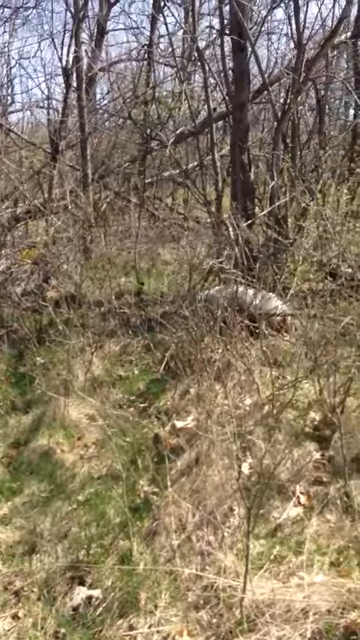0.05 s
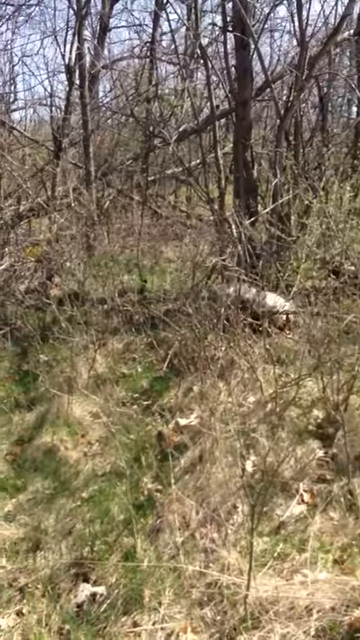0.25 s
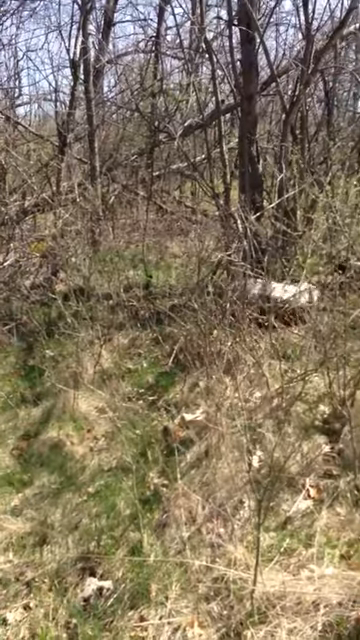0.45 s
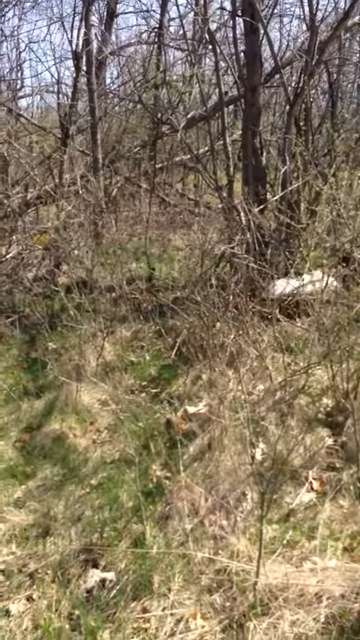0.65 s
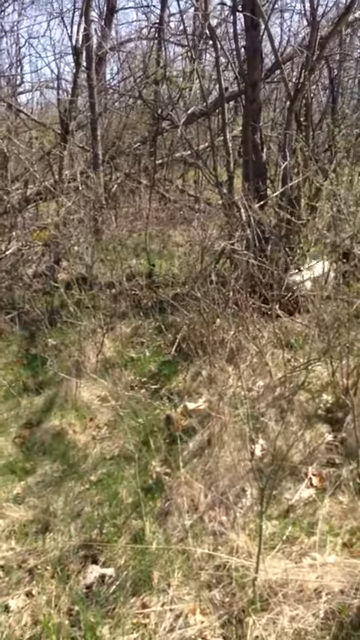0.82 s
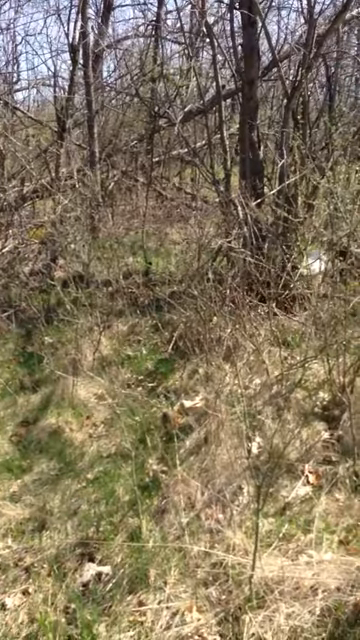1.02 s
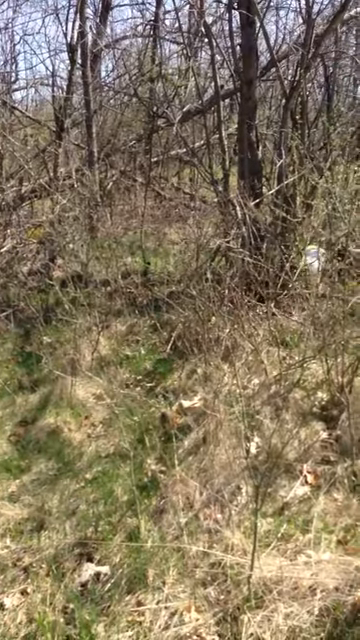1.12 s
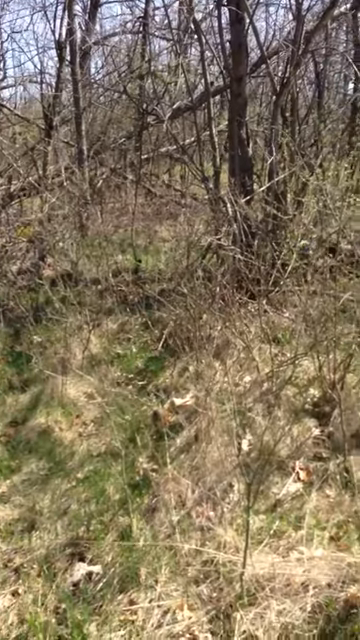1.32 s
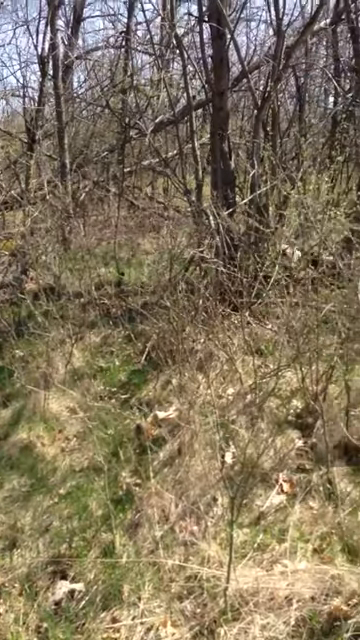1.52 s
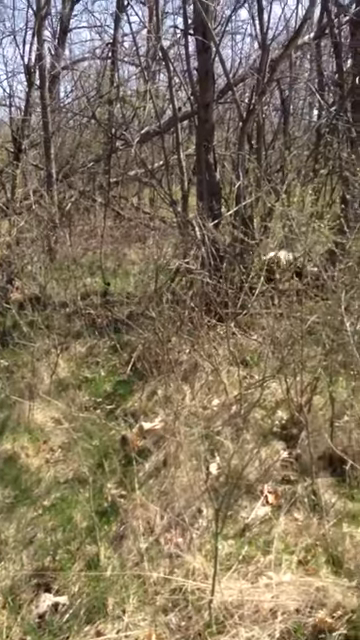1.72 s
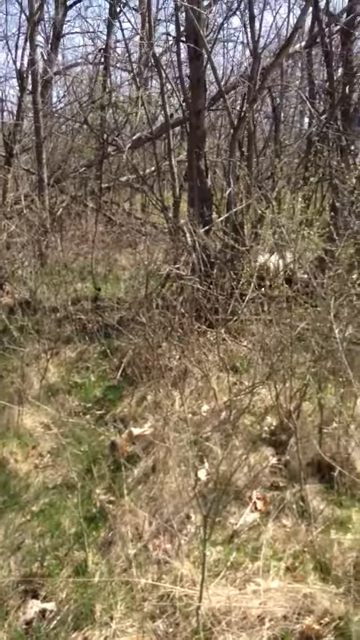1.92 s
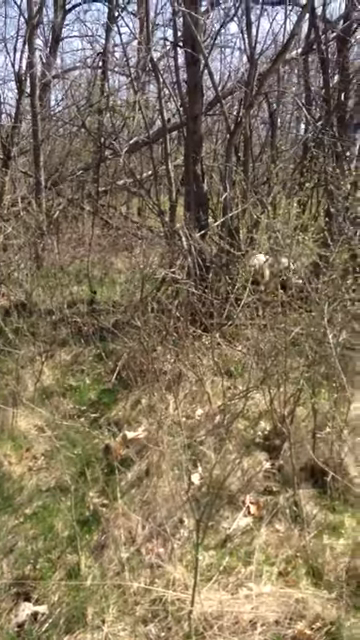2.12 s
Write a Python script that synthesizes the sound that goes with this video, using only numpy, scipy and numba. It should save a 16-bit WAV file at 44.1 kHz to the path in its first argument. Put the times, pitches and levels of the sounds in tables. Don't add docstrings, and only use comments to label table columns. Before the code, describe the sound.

A dog pushes through dry leaf litter and brush some metres away; thin crackly swishes and tiny twig ticks, one sharp stick snap near the start, then a faint paw thud, over very quiet outdoor air, in mono.

```python
import sys
import numpy as np
from scipy import signal
from scipy.fft import rfft, irfft, next_fast_len
from scipy.io import wavfile
from scipy.ndimage import uniform_filter1d
from numba import njit

SR = 44100
rng = np.random.default_rng(int(sys.argv[2]) if len(sys.argv) > 2 else 0)


def volts_from_decibels(level):
    exponent = np.asarray(level, float) / 20
    return 10 ** exponent


def wav_record(signal):
    frames = np.transpose(np.atleast_2d(signal))
    bounded = np.clip(frames, -1, 1)
    quanta = np.round(bounded * 32767).astype(np.int16)
    wavfile.write(sys.argv[1], SR, quanta)


N = 94815
T = np.arange(N) / SR

# peak_s, rise_s, fall_s, level_db, pitch_hz
STRIDES = [(.03, 0.031, 0.042, -52.5, 5130), (.15, 0.078, 0.22, -55, 6800), (.30, .04, 0.1, -57.5, 6100),
           (.39, 0.034, 0.035, -58, 6000), (.54, 0.023, 0.15, -54.5, 4700),
           (0.617, 0.0034, 0.0076, -40, 4700), (.644, 0.0064, 0.018, -42.5, 5500),
           (0.701, 0.063, 0.069, -49, 6000), (.78, .01, 0.019, -54, 4960), (.90, 0.043, 0.054, -50.5, 6140),
           (.96, 0.035, 0.037, -47, 5400), (.995, 0.03, 0.02, -44, 6800), (1.096, 0.04, 0.059, -51.5, 6900),
           (1.128, 0.033, 0.015, -52, 6600), (1.311, 0.043, 0.045, -53.5, 5000),
           (1.35, 0.027, 0.027, -53.5, 5400), (1.452, 0.038, 0.023, -55, 7550),
           (1.505, 0.0089, 0.0093, -54.5, 6500), (1.585, 0.053, 0.043, -52.5, 6400),
           (1.776, 0.036, 0.057, -46, 5400), (1.81, 0.028, 0.025, -49.5, 4840),
           (1.85, 0.061, 0.062, -49, 6000), (1.919, 0.01, 0.028, -53.5, 6800),
           (2.09, .06, 0.099, -55, 5250)]
# start_s, peak_db, pitch_hz, t60_s
TWIG_TICKS = [(.019, -43, 3960, 0.025), (.034, -44, 4540, 0.033), (0.1363, -41, 8000, 0.0041),
              (0.1675, -41.5, 7660, 0.023), (0.5008, -46, 7850, 0.0043), (0.529, -37, 3100, .015),
              (.5574, -46, 3500, .008), (0.6135, -35, 7900, 0.0034), (0.6398, -32.5, 7000, 0.0036),
              (.655, -41, 7000, .003), (.683, -35, 8000, 0.012), (.687, -48, 9000, .003),
              (.7045, -41, 5970, 0.01), (.777, -46.5, 5060, 0.019), (0.8552, -36, 5700, 0.0067),
              (.876, -44, 7500, 0.0091), (.899, -51, 7000, .005), (.902, -40, 9000, 0.0032),
              (.9184, -42, 7800, .003), (0.924, -42, 7500, .004), (0.979, -34, 4800, .006),
              (.991, -42, 7000, 0.0024), (1.308, -39, 4000, 0.0055), (1.449, -39.5, 8040, 0.0039),
              (1.709, -41, 8800, 0.019), (1.776, -34, 9100, 0.0068), (2.033, -42, 10000, 0.0043),
              (2.059, -37, 8900, 0.0018), (2.084, -43, 5000, 0.016), (2.1312, -40, 4500, 0.011)]
# frequency_hz, level_db
LEAF_SPECTRUM = [(500, -17), (1200, -9), (2300, -4), (4200, -2), (6800, 0.5), (9500, -2.5), (12500, -3.5),
                 (15500, -8)]
# frequency_hz, level_db, t60_s
STICK_MODES = [(766, -35.5, 0.057), (1750, -23.5, 0.022), (3100, -10, 0.012), (4400, -6, 0.011),
               (5400, -2.5, 0.0086), (6160, 1, 0.0066), (6800, -3, 0.0068), (7800, -20, 0.0074),
               (10600, -11, 0.0099), (12090, -12, 0.0086)]
# frequency_hz, level_db
SPLINTER_SPECTRUM = [(400, -24), (1500, -12), (7000, 0), (15000, -8)]
# peak_s, length_s, level_db, pitch_hz
SOIL_SCUFFS = [
    (0.464, 0.015, -63.5, 810),
    (.51, 0.052, -66.5, 503),
    (.55, 0.012, -63, 182),
    (1.283, 0.013, -60, 161),
    (1.675, .02, -61, 900),
    (1.799, 0.013, -58, 1450),
    (1.813, 0.018, -57, 365),
    (2.108, 0.027, -62, 900),
]
# frequency_hz, level_db (per Hz)
AIR_SPECTRUM = [(25, -40), (85, -7.5), (140, 5), (210, 4), (450, -4), (850, -1), (2500, -13), (15500, -17)]


def shape(x, table):
    hz, db = np.array(table, float).T
    n = next_fast_len(len(x), True)
    f = np.maximum(np.arange(n // 2 + 1) * SR / n, 1.0)
    gain = volts_from_decibels(np.interp(np.log(f), np.log(hz), db))
    return irfft(rfft(x, n) * gain, n)[:len(x)]


def unit(x):
    return x / np.sqrt(np.mean(x ** 2))


def walk(rate_hz):
    hold = int(SR / rate_hz)
    steps = np.repeat(rng.standard_normal(N // 32), hold)[:N]
    return uniform_filter1d(uniform_filter1d(steps, hold), hold)


@njit
def rings(n, start, turn, fade, size):
    out = np.zeros(n)
    for g in range(len(start)):
        step = np.exp(1j * turn[g] - fade[g])
        i = int(start[g])
        z = (1. + 0j) * step ** (i + 1 - start[g])
        while abs(z) > .002 and i + 1 < n:
            i += 1
            out[i] += size[g] * z.imag
            z *= step
    return out


def ring(start_s, hz, t60_s, size):
    hz = np.clip(hz, 100, .45 * SR)
    fade = np.log(1000) / (np.maximum(t60_s, 1e-4) * SR)
    return rings(N, start_s * SR, 2 * np.pi * hz / SR, fade, size)


def leaves():
    grain_count, grain_cycles, octaves = 28000, 1.72, 0.51
    spread_db, top_db, patchy_db = 2.5, 15, 1.63
    bed = volts_from_decibels(-64.5) ** 2
    power, pitch = bed + 0 * T, bed * np.log(6000.)
    for peak_s, rise_s, fall_s, db, hz in STRIDES:
        age = np.where(T < peak_s, (peak_s - T) / rise_s, (T - peak_s) / fall_s)
        push = volts_from_decibels(db) ** 2 * np.exp(-2 * age)
        power = power + push
        pitch = pitch + push * np.log(hz)
    when, tone, big, sign = rng.random((grain_count, 4)).T
    at = (when * (N - 1)).astype(int)
    hz = np.exp(pitch / power)[at] * 2 ** (octaves * 2 * (2 * tone - 1))
    grain_db = np.minimum(-spread_db * np.log(big + 1e-9), top_db)
    size = volts_from_decibels(grain_db) * np.sign(sign - .5) * hz
    t60_s = np.log(1000) * grain_cycles / (np.pi * hz)
    grains = ring(at / SR, hz, t60_s, size)
    return unit(shape(grains, LEAF_SPECTRUM)) * np.sqrt(power) * volts_from_decibels(patchy_db * walk(90))


def twigs():
    ring_db, ring_share, rise_share, crack_db = -12, .4, 0.087, 0.5
    start_s, peak_db, pitch_hz, t60_s = np.array(TWIG_TICKS).T
    out = ring(start_s, pitch_hz, ring_share * t60_s, volts_from_decibels(peak_db + ring_db))
    t = T[:2048]
    noises = rng.standard_normal((len(start_s), len(t)))
    for s, db, hz, t60, noise in zip(start_s, peak_db, pitch_hz, t60_s, noises):
        fibres = shape(noise, LEAF_SPECTRUM)
        fibres = shape(fibres, [(hz / 3, -9), (hz, 0), (hz * 2, -5)])
        rise = 1 - np.exp(-t / (rise_share * t60))
        crack = fibres * rise * 10 ** (-3 * t / max(t60, .001))
        i = int(s * SR)
        out[i:i + len(t)] += (volts_from_decibels(db + crack_db) * crack / np.abs(crack).max())[:N - i]
    return out


def snap():
    snap_s, swell_s, snap_db = .2224, 0.00041, -17.5
    rise_s, splinter_t60_s, splinter_db = 0.00023, 0.075, -14.5
    hz, db, t60_s = np.array(STICK_MODES).T
    age = np.maximum(T - snap_s, 0)
    tear = 1 - np.exp(-(age / swell_s) ** 2)
    wood = ring(snap_s + 0 * hz, hz, t60_s, volts_from_decibels(db)) * tear
    wood = signal.sosfilt(signal.butter(2, 400, "high", fs=SR, output="sos"), wood)
    dust = shape(rng.standard_normal(N) * volts_from_decibels(1.5 * walk(600)), SPLINTER_SPECTRUM)
    splinters = unit(dust) * (1 - np.exp(-age / rise_s)) * 10 ** (-3 * age / splinter_t60_s)
    return volts_from_decibels(snap_db) * (wood / np.abs(wood).max() + volts_from_decibels(splinter_db) * splinters)


def thud():
    thud_s, width_s, hz, db = .437, 0.0024, 263, -46
    envelope = np.exp(-((T - thud_s) / width_s) ** 2 / 2)
    return volts_from_decibels(db) * envelope * np.sin(2 * np.pi * hz * (thud_s + 0.00053 - T))


def scuffs():
    noise = rng.standard_normal(N)
    out = np.zeros(N)
    for peak_s, length_s, db, hz in SOIL_SCUFFS:
        soil = unit(shape(noise, [(hz / 2, -25), (hz, 0), (hz * 2, -25)]))
        out += volts_from_decibels(db) * np.exp(-((T - peak_s) / length_s) ** 2) * soil
    return out


def scatter(brush):
    level_db, t60_s = -15, .03
    t = T[:4000]
    stems = rng.standard_normal(len(t)) * 10 ** (-3 * t / t60_s)
    stems = stems / np.sqrt(np.sum(stems ** 2))
    return volts_from_decibels(level_db) * signal.fftconvolve(brush, stems)[:N]


def air():
    white = unit(shape(rng.standard_normal(N), AIR_SPECTRUM))
    out = 0
    for hz in 30 * 2. ** np.arange(10):
        octave = [(hz / 2, -60), (hz / 1.5, -6), (hz / 1.33, 0),
                  (hz * 1.33, 0), (hz * 1.5, -6), (hz * 2, -60)]
        out = out + shape(white, octave) * volts_from_decibels(1.7 * walk(9.02))
    return unit(out) * volts_from_decibels(-60)


def scene():
    brush = leaves() + twigs()
    mix = brush + scatter(brush) + snap() + thud() + scuffs() + air()
    return mix[None]


def top_cut(x):
    return signal.sosfilt(signal.butter(12, 15950, fs=SR, output="sos"), x)


def record(dry):
    low_pass = signal.ellip(10, .2, 60, 15300, fs=SR, output="sos")
    return top_cut(signal.sosfilt(low_pass, dry))


dry = scene()
out = record(dry)
wav_record(out)
```